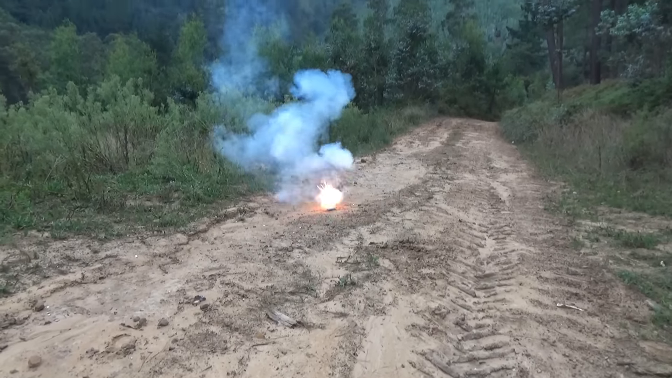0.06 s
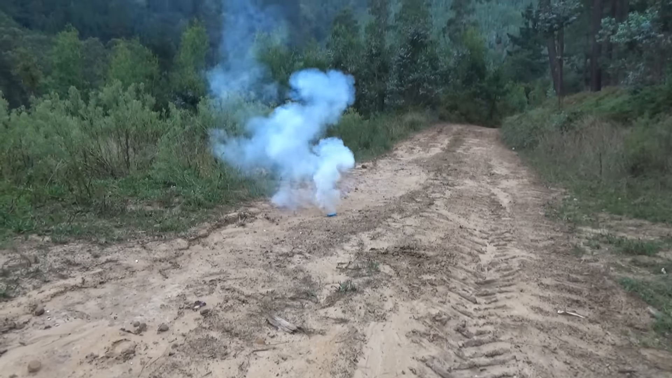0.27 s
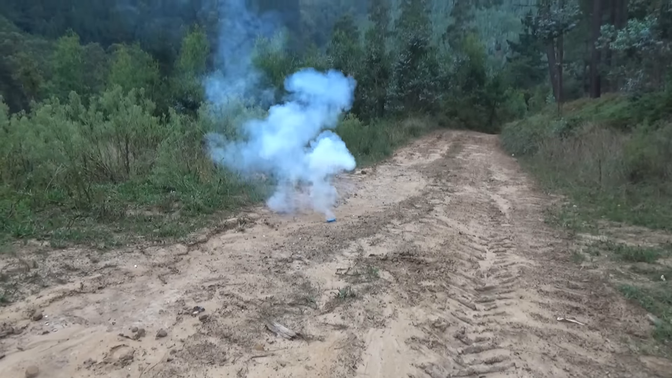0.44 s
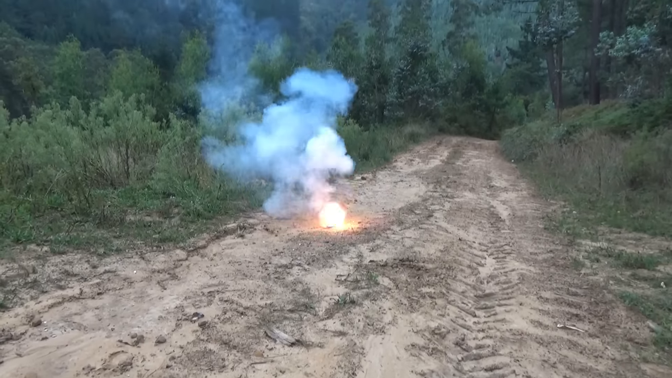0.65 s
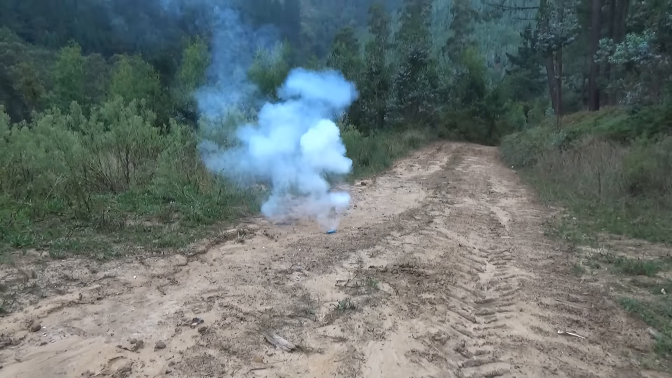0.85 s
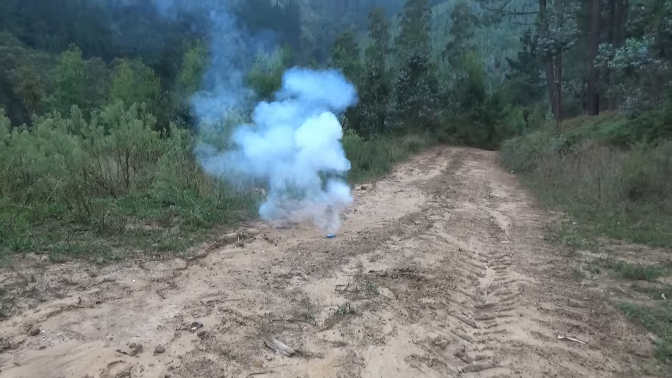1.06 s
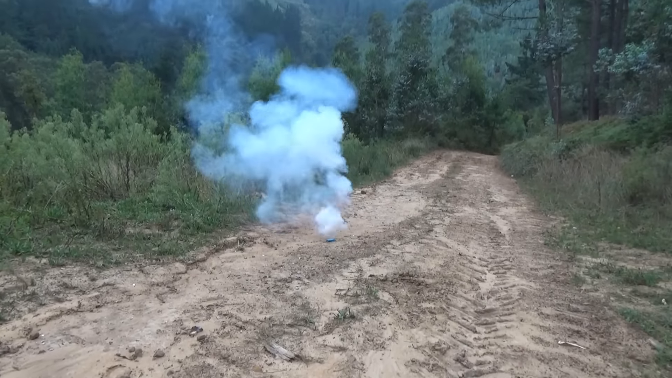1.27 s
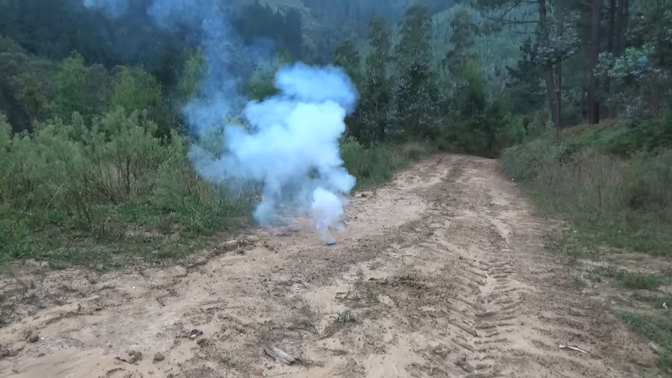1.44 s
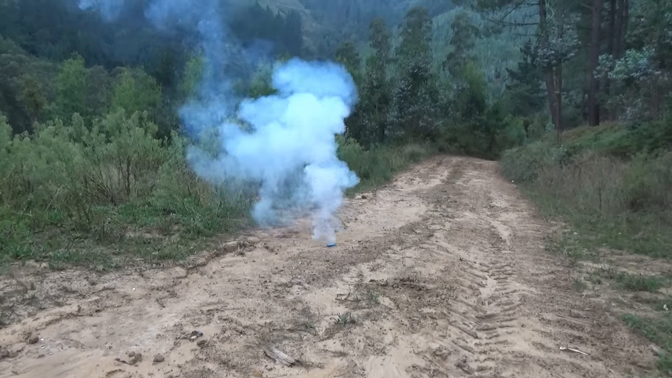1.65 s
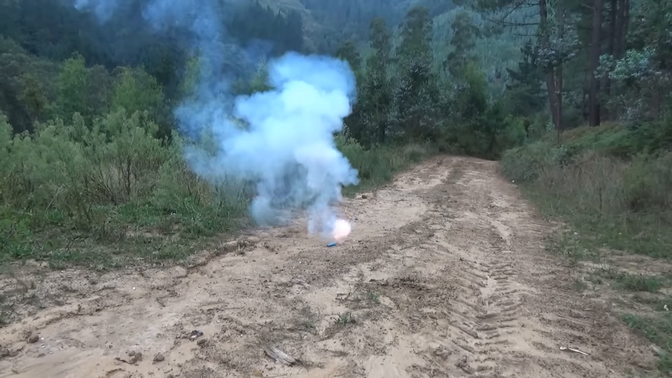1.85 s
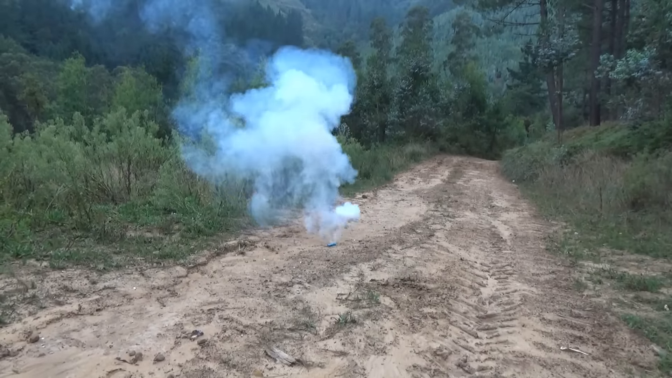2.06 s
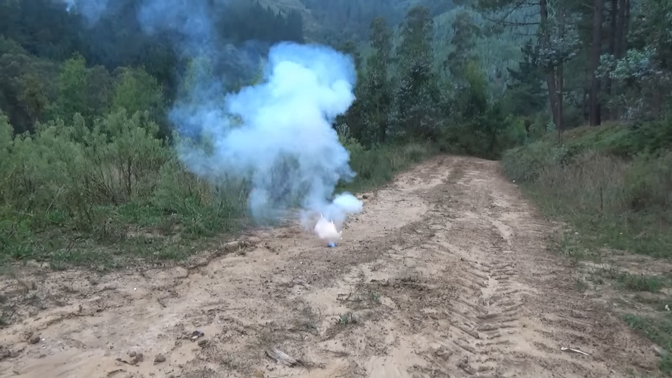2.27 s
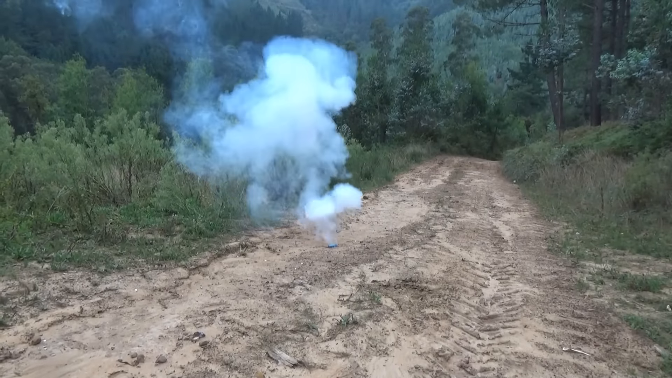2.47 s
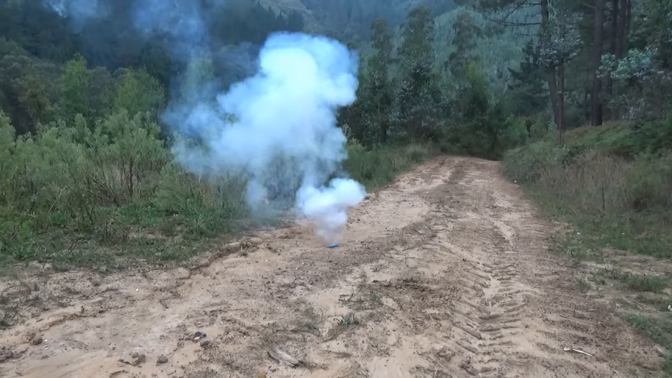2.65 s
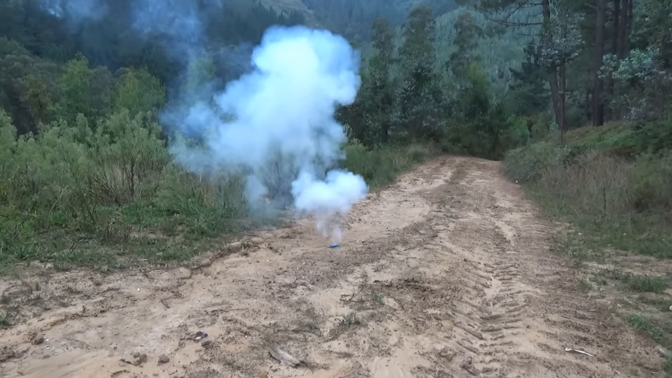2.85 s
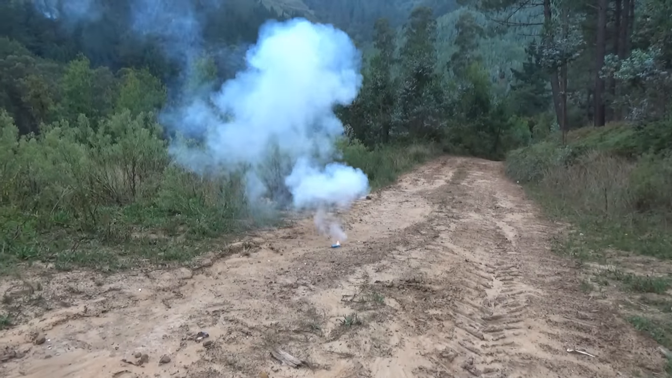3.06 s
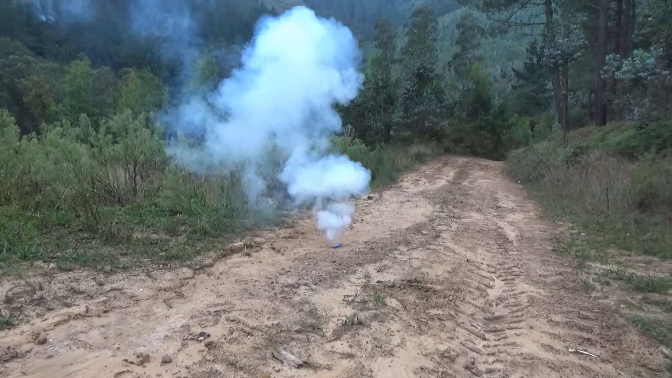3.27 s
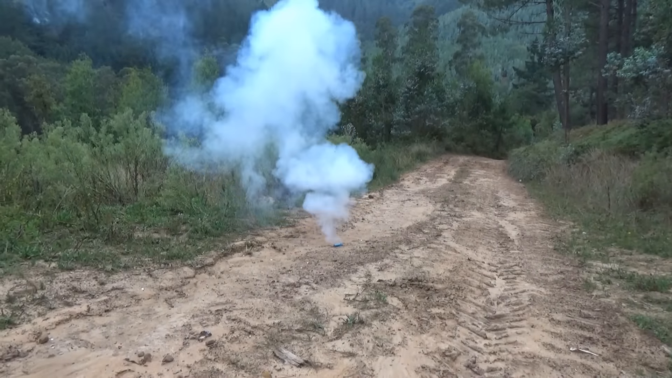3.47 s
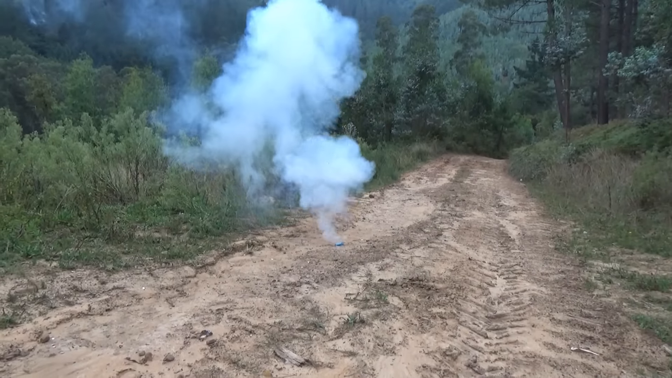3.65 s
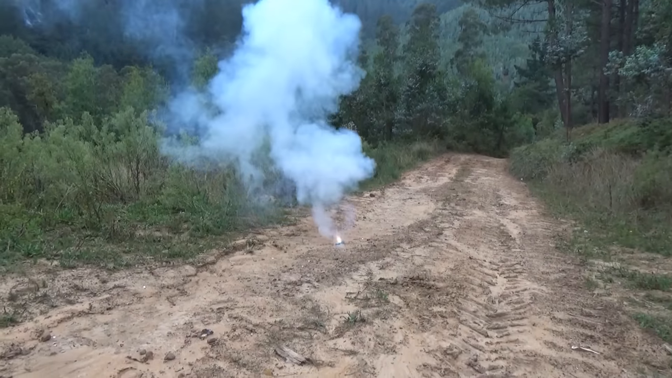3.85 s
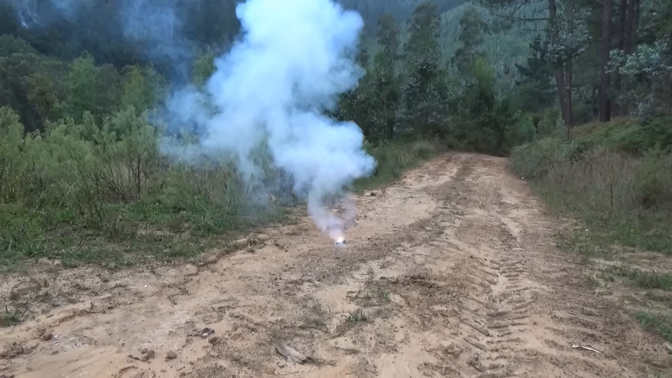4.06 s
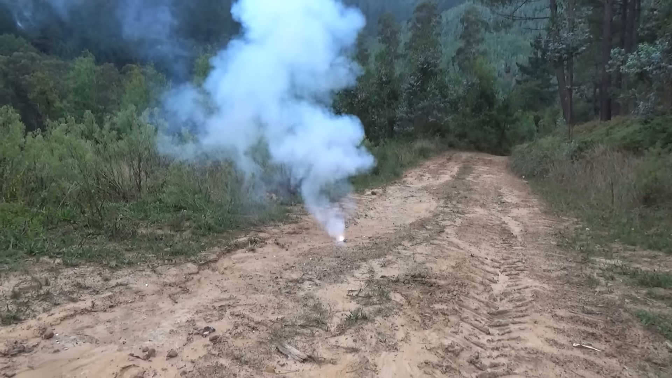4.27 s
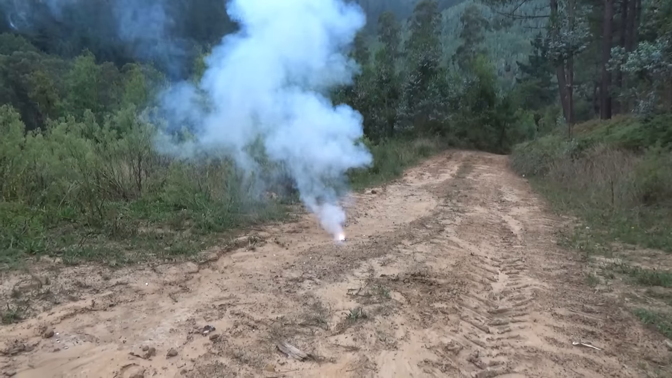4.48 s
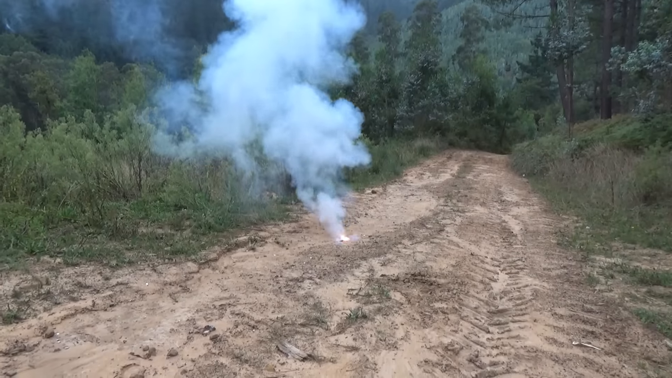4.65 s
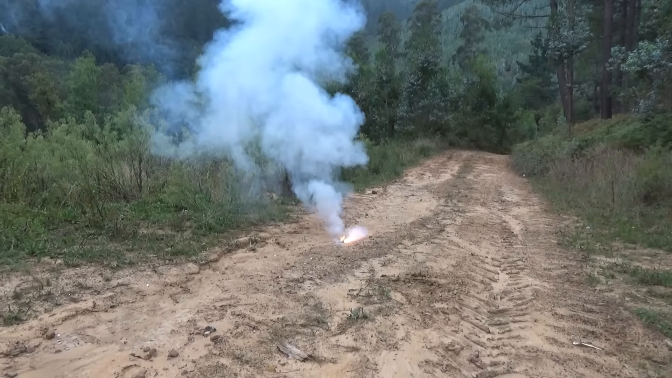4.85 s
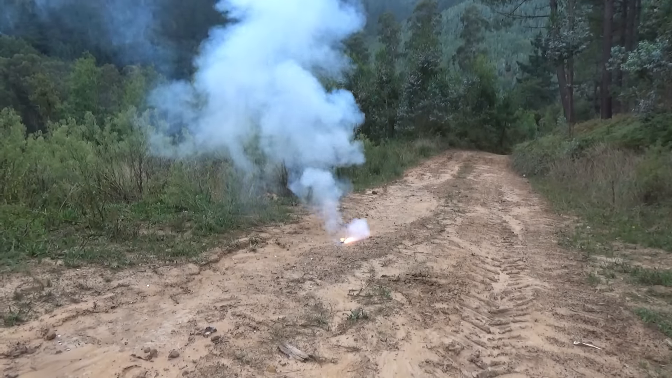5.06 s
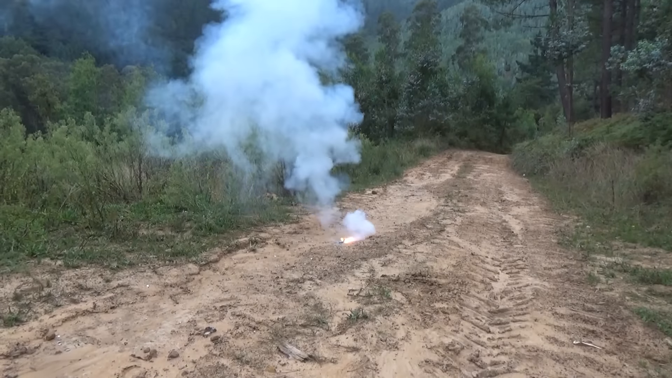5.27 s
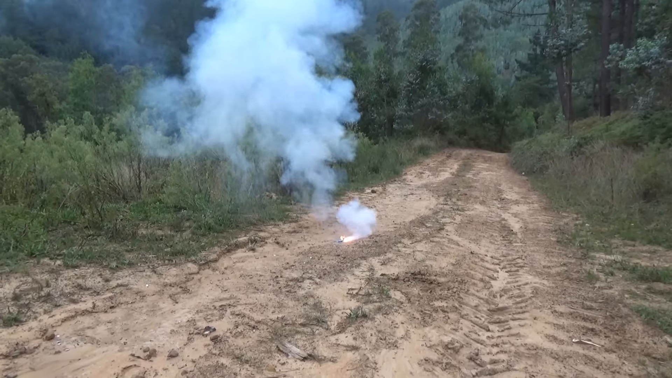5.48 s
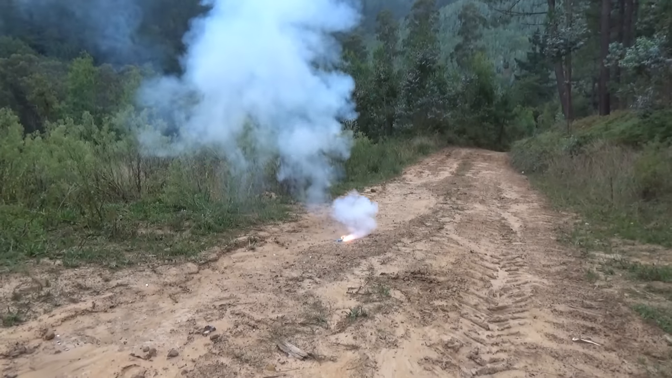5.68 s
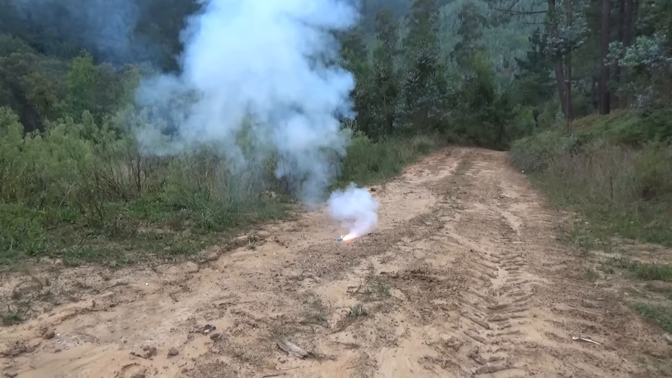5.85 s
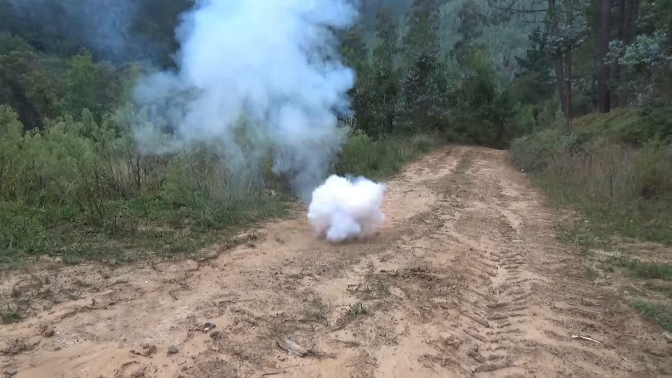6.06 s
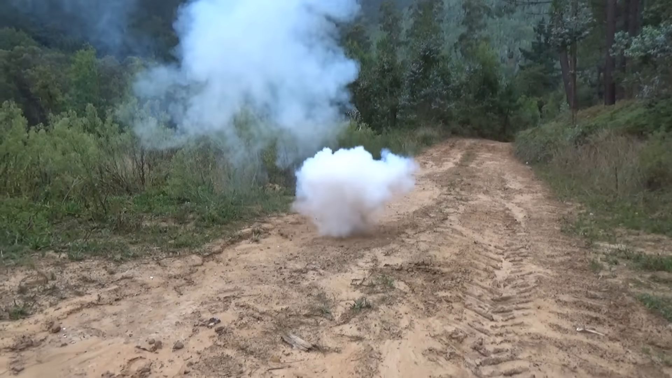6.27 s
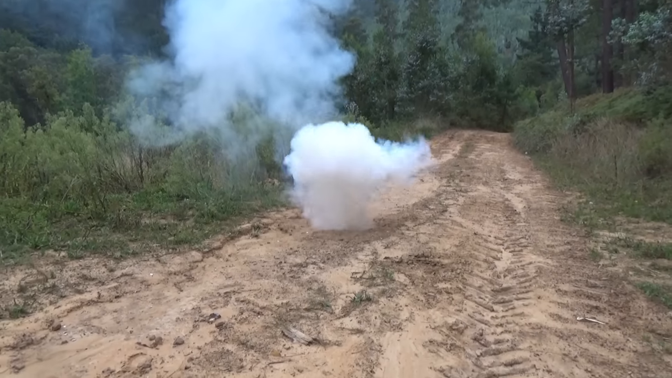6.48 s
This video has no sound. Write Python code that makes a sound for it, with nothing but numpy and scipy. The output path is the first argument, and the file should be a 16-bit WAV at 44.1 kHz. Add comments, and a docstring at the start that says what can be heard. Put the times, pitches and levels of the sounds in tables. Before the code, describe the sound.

Seven irregular gunshot-like cracks with forest echoes, hissing powder between them, then a spitting, sparkling flame and one final booming explosion outdoors.

```python
"""A firecracker on a forest dirt track, some metres from the microphone, in a faint wash of air noise.
Its smoulder, shaped noise, swells toward six cracks and lies almost silent before a seventh; each crack
is a swept shock front with nearly the same echo. Stray pops join in, and sparkles spurt before the last.
Two flares darken as they gush; a steady flame roars, hisses and spits as a fountain of sparkles grows.
A blast ends it: one more shock front, a scattered roll and bass returned by the hillsides."""
import sys
import numpy as np
from scipy import signal
from scipy.fft import rfft, irfft
from scipy.io import wavfile
from scipy.ndimage import uniform_filter1d

SR = 44100
rng = np.random.default_rng(int(sys.argv[2]) if len(sys.argv) > 2 else 0)


def to_wav(s):
    """Save 16-bit WAV."""
    ch = np.atleast_2d(s).T  # columns
    pcm = np.round(np.clip(ch, -1, 1) * 32767)  # PCM
    wavfile.write(sys.argv[1], SR, pcm.astype(np.int16))


N = 287532
T = np.arange(N) / SR
ECHO_T = T[:SR]  # one second
SHORT_T = T[:SR // 16]  # 1/16 s, for brief transients
FLAME_ON_S, FLAME_OFF_S, BLAST_S = 3.8, 6.1, 6.077
BLOW_OUT_S = 0.055  # decay time of burning once a burst blows it out


def undb(db):
    """Level and amplitude: 20 dB is a factor of ten."""
    return 10 ** (np.asarray(db) / 20)


def by_pitch(points, hz):
    """Spectral envelope: gain interpolated in decibels over log frequency."""
    table_hz, db = np.transpose(points)
    return undb(np.interp(np.log(hz + 1), np.log(table_hz), db))


def by_time(s, db):
    """Temporal envelope: gain interpolated in decibels over time."""
    return undb(np.interp(T, s, db))


# Stereo spread of diffuse sound: (frequency [Hz], side minus mid [dB], before the width setting)
WIDTH = [(60, -32), (200, -17), (600, -17), (2000, -22.5), (4000, -32), (6500, -11), (9000, -15.5),
         (13000, -41)]


def noise(points, size=N, grain_db=0, width_db=-15):
    """Filtered noise in mid and side, rms 1; grain makes it a crowd of uneven clicks."""
    hz = np.fft.rfftfreq(size, 1 / SR)
    grain = undb(grain_db * rng.standard_normal(size))
    mid, side = rfft(rng.standard_normal((2, size)) * grain)
    side = side * by_pitch(WIDTH, hz) * undb(width_db)
    left_right = np.array([mid + side, mid - side])
    y = irfft(left_right * by_pitch(points, hz), size)
    return y / y.std()


def shelves(x, bass_db, treble_db, bass_hz=600, treble_hz=5500):
    """Shelving filter: gain that tends to one value in the bass and another in the treble."""
    hz = np.fft.rfftfreq(x.shape[-1], 1 / SR)
    bass = bass_db / (1 + (hz / bass_hz) ** 3)
    treble = treble_db * (1 - 1 / (1 + (hz / treble_hz) ** 3))
    return irfft(rfft(x) * undb(bass + treble), x.shape[-1])


def waver(rate, depth_db):
    """Random amplitude modulation: a gain gliding between `rate` random levels a second."""
    k = int(SR / rate)
    steps = np.repeat(rng.standard_normal(N // k + 1), k)
    return undb(depth_db * uniform_filter1d(steps, k)[:N])


def arch(s, length_s, steepness):
    """Half-sine envelope raised to a power: it swells from nothing and sinks back."""
    progress = np.clip((T - s) / length_s, 0, 1)
    return np.maximum(np.sin(np.pi * progress), 0) ** steepness


RELIGHT_S = 0.2


def burn(start_s, end_s, fade_s):
    """Combustion envelope: a linear rise as it catches, a hold, then exponential decay."""
    caught = np.clip((T - start_s) / RELIGHT_S, 0, 1)
    return caught * np.exp(-np.maximum(T - end_s, 0) / fade_s)


def add(out, s, x):
    """Superposition: mix a sound in at a given time."""
    i = max(int(s * SR), 0)
    n = min(x.shape[-1], N - i)
    out[:, i:i + n] += x[..., :n]


def swing(hz, decay_s, db):
    """Damped oscillation: a sudden pressure step that rings away exponentially."""
    return undb(db) * np.cos(2 * np.pi * hz * SHORT_T) * np.exp(-SHORT_T / decay_s)


# Background air noise: (frequency [Hz], relative spectral level [dB])
AIR_COLOUR = [(18, -39), (30, -9), (134, -0.5), (242, -8), (746, -7), (1590, -5), (1800, -5.5),
              (2400, -7.5), (4000, -13.5), (5200, -15.5), (7200, -17), (9500, -45)]


def forest_air():
    """Broadband background: faint, slowly modulated noise."""
    return noise(AIR_COLOUR, width_db=-17) * undb(-43) * waver(4.03, 0.33)


# Smouldering powder: (frequency [Hz], relative spectral level [dB])
SMOKE_COLOUR = [(1500, -6), (3500, 1.5), (5000, -6.5), (6700, 0.5), (9500, -2.5), (12000, -9), (16000, -10)]


def smoulder(swell_s=0.09, last_db=-43, last_fade_s=0.25):
    """Combustion noise: each crack blows it out; it relights and swells before all but the last crack."""
    level = 0
    lit_s = -RELIGHT_S  # already alight at the start
    for s, *_, db, swell_db in CRACKS:
        # it grows as the fire nears the charge; before the last crack it stays almost silent
        nearness = np.exp(np.minimum(T - s, 0) / swell_s)
        level = level + burn(lit_s, s, BLOW_OUT_S) * undb(db + swell_db * nearness)
        lit_s = s
    # after the last crack it burns on until the flame takes over
    level = level + burn(lit_s, FLAME_ON_S, last_fade_s) * undb(last_db)
    return level * noise(SMOKE_COLOUR, grain_db=-2.0) * waver(60, 1.9)


# Snap of the shock front: (frequency [Hz], decay [s], level [dB])
SNAP = (3000, 0.000093, 4)


def shock():
    """Shock wave: the front snaps and the thump behind it glides down into the bass."""
    start_hz, end_hz, glide_s = 560, 99, 0.0019
    fall_s, ring_s = 0.0006, 0.022
    hz = end_hz + (start_hz - end_hz) * np.exp(-SHORT_T / glide_s)
    thump = np.cos(2 * np.pi * np.cumsum(hz) / SR)
    thump = thump * np.exp(-SHORT_T / ring_s) / (1 + SHORT_T / fall_s)
    # the pushed-out air sinks back in one slow, deep swing
    sink_back = swing(60, 0.0045, -22.5)
    return thump + sink_back - swing(*SNAP)


def scatter(patches, law, colour, grain_db, far_s=0.24):
    """Diffuse reflection: each patch returns a cloud of echoes around its delay; far ones have less bass."""
    out = 0
    rise_share, bass_db, bass_slope_db = law
    for delay, decay, db, treble_db in patches:
        lag = ECHO_T - delay
        cloud = np.exp(np.minimum(lag / rise_share, -lag) / decay)
        echoes = noise(colour, size=SR, grain_db=grain_db, width_db=-0.5)
        doublings = np.log2(delay / .05)
        out = out + undb(db) * cloud * shelves(echoes, bass_db + bass_slope_db * doublings, treble_db)
    # air absorption: long paths lose the highest treble
    far = np.minimum(ECHO_T / far_s, 1)
    return (1 - far) * out + far * shelves(out, 0, -24, treble_hz=12100)


# Cracks of the firecracker, with the smoulder leading to each: (time [s], shock [dB], echo [dB],
# echo treble [dB], late echo [dB], flash [dB], smoulder before it [dB], swell of that smoulder [dB])
CRACKS = [(0.1005, 0.5, 4, -2.5, -1, -13.5, -45, 3), (0.7348, -2, 3, -0.5, -2, -15.5, -46, 7),
          (1.2004, 3.5, -1, 0, 2.5, -19, -58, 8), (1.8849, -2.5, 4.5, -3, -3, -16, -45.5, 15.5),
          (2.2810, 1, 0.5, -3, 0.5, -19.5, -42, 5), (2.6560, -4.5, 1, -4.5, -3.5, -14.5, -54.5, 21),
          (3.1596, 3.5, -0.5, -0.5, 1, -21, -68, 0)]
# Single hard reflectors, ruts and trunks: (delay [s], level [dB], centre [Hz], decay [s])
TRUNKS = [(.0083, -12.5, 596, 0.0017), (.0360, -6.5, 2780, 0.00071), (0.063, -10, 1500, 0.00032),
          (0.0883, -10, 2200, 0.00053), (.0905, -19, 7500, .0002), (0.1443, -23, 3050, 0.00015)]
# Scattering ground, grass, bushes and trees: (delay [s], decay [s], level [dB], treble [dB])
FOREST = [(.007, 0.028, -21.5, 0), (.026, 0.009, -20, 13), (.044, 0.021, -16, 2.5),
          (.061, 0.019, -17.5, 1.5), (.088, 0.036, -23, 8), (.125, .075, -26.5, 8.5),
          (.165, 0.095, -23.5, 6), (.29, 0.17, -38, -1)]
# Scattering law: (swell time as a share of the decay [-], bass at 50 ms delay [dB],
# bass change per doubling of the delay [dB])
FOREST_ECHO = (.38, 1.16, -3.5)
# Forest echo: (frequency [Hz], relative spectral level [dB])
ECHO_COLOUR = [(35, -50), (60, -16), (222, -10.5), (363, -13), (607, -6), (785, -8), (903, -4), (991, -8),
               (1510, -5.5), (1660, -3), (1860, -6), (2900, -6.5), (4750, -13.5), (11800, -13),
               (16000, -28.5)]


def forest_echo():
    """Diffuse reflection from the forest: one random draw of its scattered echo."""
    return scatter(FOREST, FOREST_ECHO, ECHO_COLOUR, grain_db=3)


def cracks(own_db=-5, flash_build_s=0.0063):
    """Impulse response: a flash builds, a shock front bursts, and the forest answers much alike each time."""
    forest = forest_echo()
    trunks = np.zeros_like(forest)
    for delay, db, hz, decay in TRUNKS:
        add(trunks, delay, swing(hz, decay, db))
    out = np.zeros((2, N))
    flash_colour = [(40, -18), (150, -1), (500, -16.5), (1200, -17.5), (3000, -25.5), (9000, -19.5), (16000, -31)]
    late = np.minimum(ECHO_T / 0.098, 1)
    for s, shock_db, echo_db, treble_db, late_db, flash_db, _, _ in CRACKS:
        flash = noise(flash_colour, size=len(SHORT_T)) * np.exp(-SHORT_T[::-1] / flash_build_s)
        add(out, s - SHORT_T[-1], undb(flash_db) * flash)
        add(out, s, undb(shock_db) * shock())
        # no two bursts radiate quite alike, so a part of the echo is new
        echo = forest + undb(own_db) * forest_echo()
        echo = echo / np.hypot(1, undb(own_db))
        # moving air makes the long paths swell and fade
        echo = echo * waver(22.2, 0.99)[:SR] ** late
        add(out, s, undb(echo_db + late * late_db) * shelves(echo + trunks, 0, treble_db))
    return out


# Stray pops: (time [s], level before the treble is softened [dB])
POPS = [(0.7358, -15.5), (2.6482, -13), (2.652, -10), (2.666, -10.5), (3.149, -12), (3.578, -18.5)]


def pops(pop_hz=290, pop_decay_s=0.0014, soft_db=-18):
    """Damped oscillation: stray lumps of powder go off with a soft thump."""
    out = np.zeros((2, N))
    for s, db in POPS:
        add(out, s, swing(pop_hz, pop_decay_s, db))
    return shelves(out, 0, soft_db, treble_hz=2000)


# Sparkling fountain: (time [s], relative level [dB])
FOUNTAIN = [(4.1, -63), (4.36, -67), (4.648, -37), (4.768, -40.5), (4.794, -29), (4.832, -32),
            (6.05, -30.5)]
# Hiss of sparkles and sparks: (frequency [Hz], relative spectral level [dB])
HISS_COLOUR = [(1500, -23), (4400, -13.5), (5500, -10.5), (6700, -3), (9000, -1), (10200, -3),
               (11500, -12.5), (14000, -12), (16000, -29)]


def sizzle(ticks_per_s=140, tick_db=10, fountain_gain_db=-2, spit_db=-13, spit_s=0.0026):
    """Random impulse train: sparkles hiss, tick and spit in one spurt, then a fountain until the blast."""
    kicks = (rng.random(N) < ticks_per_s / SR) * rng.standard_normal(N)
    ticks = undb(tick_db) * signal.fftconvolve(kicks, swing(8800, .00008, 0))[:N]
    # each tick makes the hiss jump and sink back
    jumps = signal.fftconvolve(kicks ** 2, np.exp(-ECHO_T / spit_s))[:N]
    spitting = 1 + undb(spit_db) * jumps
    fountain = by_time(*np.transpose(FOUNTAIN)) * undb(fountain_gain_db)
    fountain = fountain * burn(FLAME_ON_S, BLAST_S, BLOW_OUT_S)
    spurt = undb(-34.5) * arch(2.755, 0.13, 0.57)
    sparkles = noise(HISS_COLOUR, grain_db=5.5) * spitting + ticks
    return sparkles * waver(30, 1.) * (fountain + spurt)


# The loudest sparks: (time [s], relative level [dB])
SPARKS = [(2.962, -22), (4.6387, -9), (4.7934, -9), (4.911, -13), (5.030, -6), (5.3769, -9), (5.427, -4),
          (5.475, -8), (5.6423, 0), (5.8003, -5), (6.0413, -10)]


def sparks(pop_gain_db=2.5, fizz_db=-17, thin_db=-18):
    """Small-source radiation: bigger sparks pop and fizz, too small to radiate much below the treble."""
    out = np.zeros((2, N))
    for s, db in SPARKS:
        add(out, s, swing(10270, .00007, db + pop_gain_db))
        fizz = noise(HISS_COLOUR, size=1024) * np.exp(-T[:1024] / 0.002)
        add(out, s, undb(db + fizz_db) * fizz)
    return shelves(out, thin_db, 0, bass_hz=4500)


# Flares of gas: (start [s], length [s], steepness of the swell as an exponent [-],
# level [dB], bass [dB], treble [dB])
FLARES = [(3.566, 0.067, 2.3, -28.5, 7, 14.5), (3.743, 0.15, 0.57, -24, -8, 10.5)]
# Gushing gas: (frequency [Hz], relative spectral level [dB])
FLARE_COLOUR = [(47, -65.5), (80, -33), (102, 1.5), (203, 4.5), (451, -2), (601, 4), (702, -4.5),
                (1860, -1), (3470, -7), (13700, -6.5), (16000, -18)]


def flares(body_db=5.5, darken_db=-19):
    """Time-varying spectrum: as a short gush of gas spends itself its treble fades and its body grows."""
    out = np.zeros((2, N))
    for s, length_s, steepness, db, bass_db, treble_db in FLARES:
        bright = shelves(noise(FLARE_COLOUR, size=SR, grain_db=1.5), bass_db, treble_db)
        dull = undb(body_db) * shelves(bright, 0, darken_db)
        spent = np.minimum(ECHO_T / length_s, 1)
        gush = (1 - spent) * bright + spent * dull
        add(out, s, undb(db) * arch(0, length_s, steepness)[:SR] * gush)
    return out


# The steady flame: (time [s], relative roar level [dB], relative gas jet level [dB])
FLAME = [(3.9, -36, -35.5), (4.32, -35, -42.5), (4.71, -32.5, -35.5), (4.98, -35, -49.5),
         (5.74, -33.5, -48), (5.77, -31.5, -41.5), (6.05, -32, -44)]
# Low roar: (frequency [Hz], relative spectral level [dB])
ROAR_COLOUR = [(25, -36), (60, -16), (110, -4.5), (200, 1), (380, -4.5), (600, -3.5), (1000, -11.5),
               (2000, -26.5), (5000, -41)]
# Gas jet: (frequency [Hz], relative spectral level [dB])
JET_COLOUR = [(500, -2.5), (1200, -1.5), (1900, -1.5), (3000, -7.5), (4500, -20), (8000, -20.5),
              (16000, -20.5)]


def flame(roar_gain_db=1, jet_gain_db=3.5):
    """Combustion and jet noise: a fluttering low roar with the rush of the gas above it."""
    s, roar_db, jet_db = np.transpose(FLAME)
    alight = (1 + np.tanh((T - FLAME_ON_S) / 0.057)) * (T < FLAME_OFF_S) / 2
    roar = noise(ROAR_COLOUR) * by_time(s, roar_db + roar_gain_db) * waver(30, 0.46)
    jet = noise(JET_COLOUR) * by_time(s, jet_db + jet_gain_db) * waver(60, 1.5)
    return alight * (roar + jet)


# Ground and hillsides that throw back the blast: (delay [s], decay [s], level [dB], treble [dB])
HILLS = [(.003, 0.009, -10, 9.5), (.016, .04, -13, 4), (.055, 0.032, -12, 2), (.150, .15, -14.5, 7),
         (.235, .06, -13, 5.5), (.322, 0.16, -14, -1)]
# Scattering law: (swell time as a share of the decay [-], bass at 50 ms delay [dB],
# bass change per doubling of the delay [dB])
HILL_ECHO = (0.67, 0.8, -1.83)
# Blast and its roll: (frequency [Hz], relative spectral level [dB])
BLAST_COLOUR = [(24, -53), (40, -20), (151, -8), (194, -3), (269, -2), (556, -9), (852, -8), (1120, -10.5),
                (2570, -14.5), (2770, -14.5), (4680, -20.5), (11000, -20.5), (14100, -27.5), (16000, -40)]


def blast(shock_db=-3.5, top_db=5):
    """Shock wave and diffuse reflection: the main charge, then a roll from ground and hillsides."""
    out = np.zeros((2, N))
    add(out, BLAST_S, undb(shock_db) * shock())
    roll = scatter(HILLS, HILL_ECHO, BLAST_COLOUR, grain_db=2.5, far_s=0.23)
    add(out, BLAST_S, shelves(roll, 0, top_db, treble_hz=11900))
    # the case tears open just ahead of the full burst
    tear = noise(BLAST_COLOUR, size=1024) * np.exp(-T[:1024] / .008)
    add(out, BLAST_S - .007, undb(-14.5) * tear)
    return out


# Deep boom returned by the hillsides: (delay [s], rise [s], decay [s], level [dB], centre [Hz])
BOOMS = [(.085, 0.015, 0.078, -20.5, 131), (.31, 0.053, 0.061, -15.5, 307)]


def boom():
    """Delayed reflection: bass from the blast rolls back in separate swells of band-limited noise."""
    out = np.zeros((2, N))
    for delay, rise, decay, db, hz in BOOMS:
        lag = ECHO_T - delay
        band = noise([(hz / 3, -35), (hz, 0), (hz * 4, -35), (hz * 20, -70)], size=SR, width_db=-1)
        swell = np.exp(np.minimum(lag / rise, -lag / decay))
        add(out, BLAST_S, undb(db) * band * swell)
    return out


def scene():
    """Superposition of the firecracker's sounds and the forest air."""
    before_flame = forest_air() + smoulder() + cracks() + pops()
    fire = sizzle() + sparks() + flares() + flame()
    return before_flame + fire + blast() + boom()


# Balance of the two microphone ports: (frequency [Hz], left minus right [dB])
PORT_BALANCE = [(60, 1), (110, 1.5), (200, 1), (380, 0), (700, -0.5), (1290, -0.5), (2380, 0), (4400, -0.5),
                (8120, 0.5), (15000, 0.0)]


def ports(x):
    """Interchannel level difference: the balance of the two ports depends on frequency."""
    half = np.sqrt(by_pitch(PORT_BALANCE, np.fft.rfftfreq(N, 1 / SR)))
    return irfft(rfft(x) * np.array([half, 1 / half]), N)


def record(dry, low_cut_hz=36, top_hz=16150):
    """Band limiting and saturation: the recorder cuts deep bass, rounds peaks and cuts the top."""
    low_cut = signal.butter(2, low_cut_hz, "high", fs=SR, output="sos")
    x = signal.sosfilt(low_cut, ports(dry))
    rounded = x / (1 + (x / .92) ** 4) ** (1 / 4)
    top_cut = signal.ellip(10, .2, 70, top_hz, fs=SR, output="sos")
    return signal.sosfilt(top_cut, rounded)


dry = scene()
out = record(dry)
to_wav(out)
```